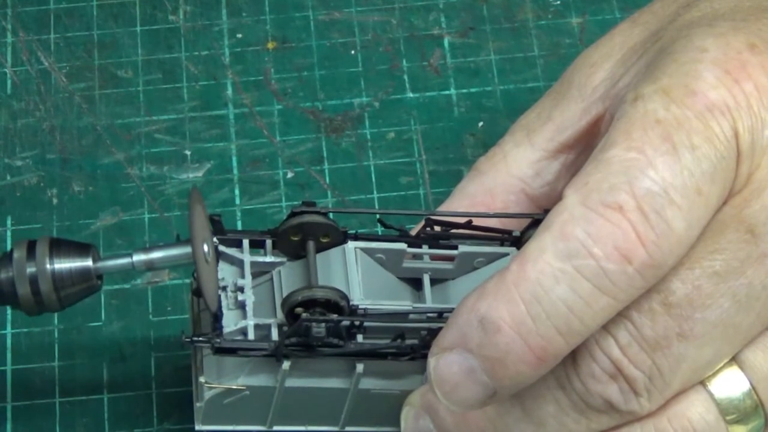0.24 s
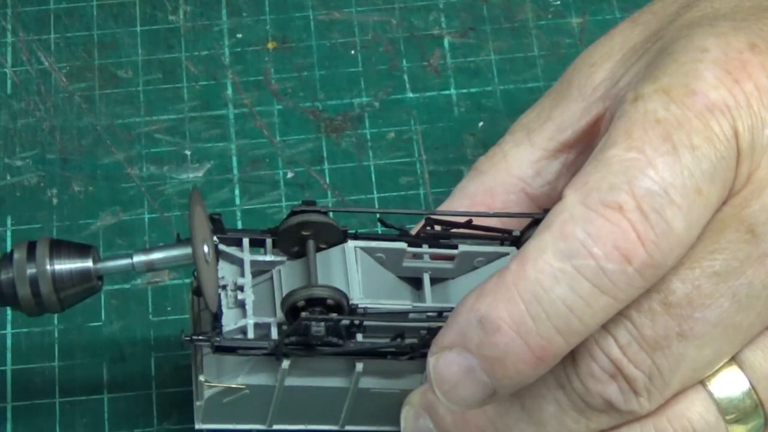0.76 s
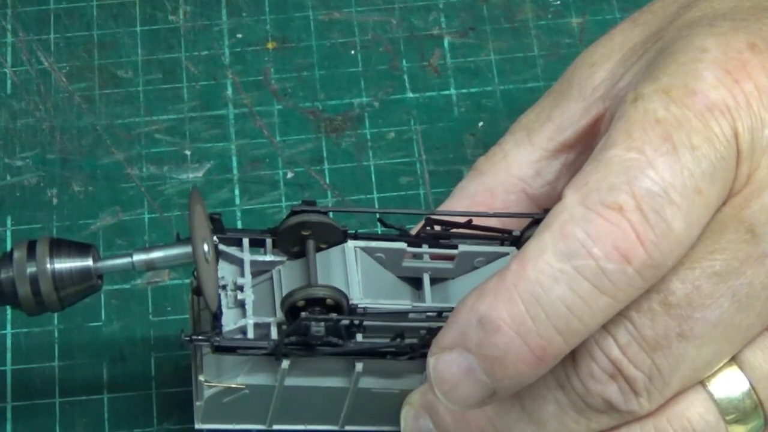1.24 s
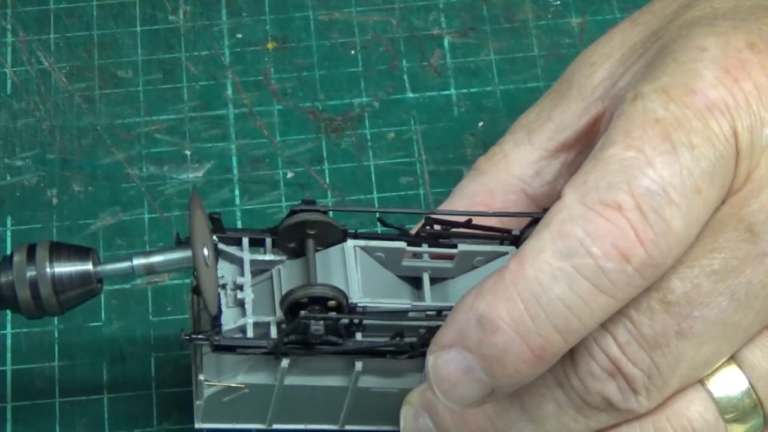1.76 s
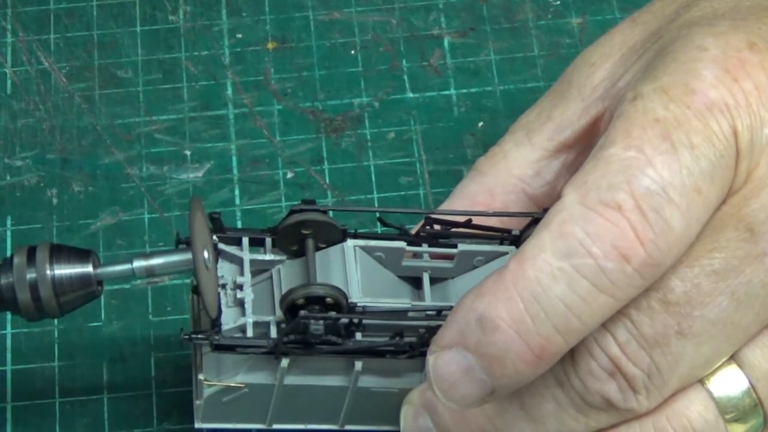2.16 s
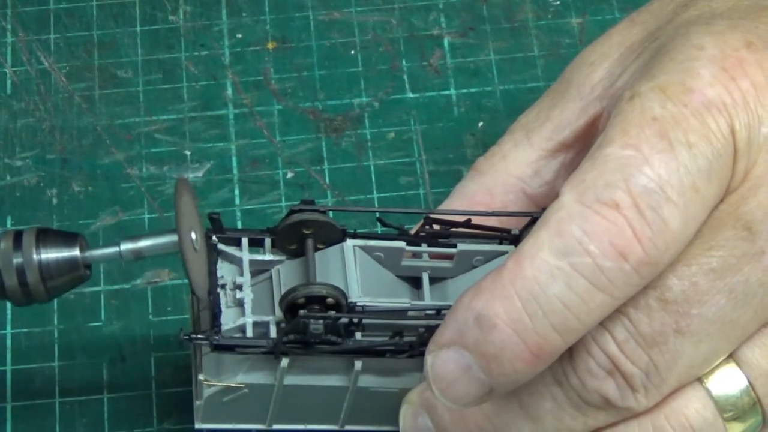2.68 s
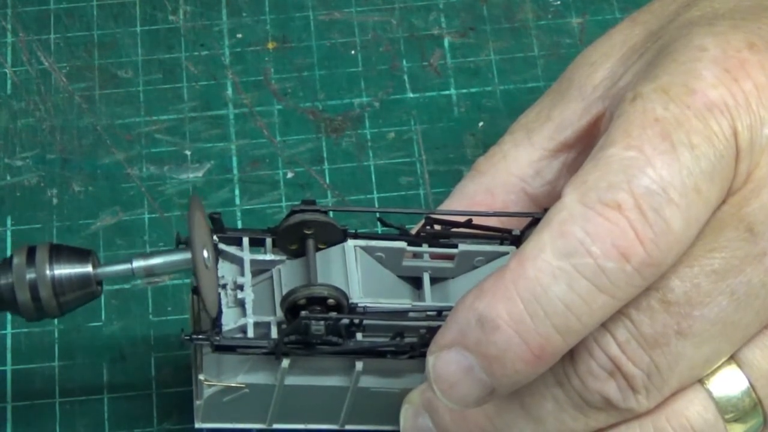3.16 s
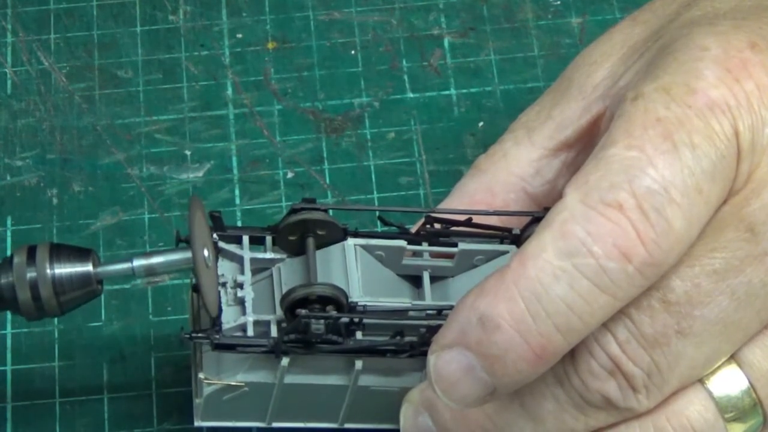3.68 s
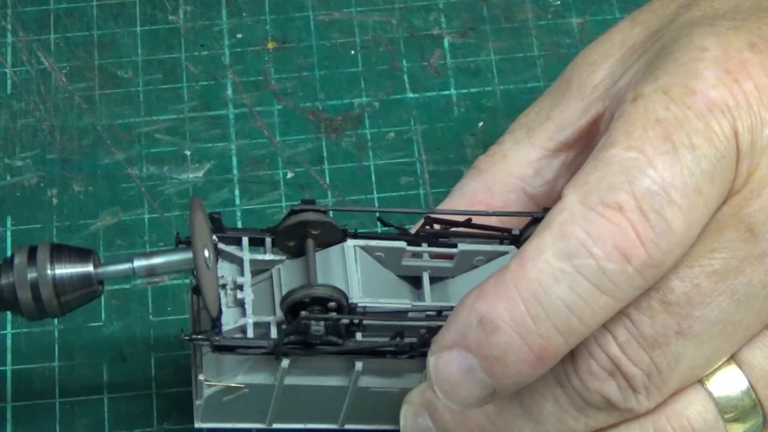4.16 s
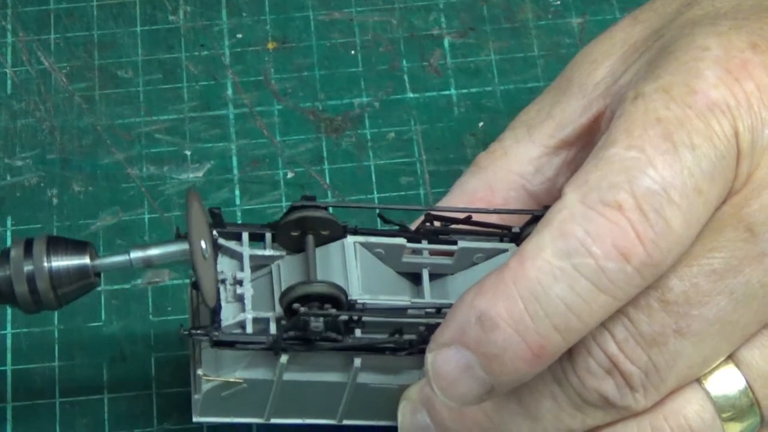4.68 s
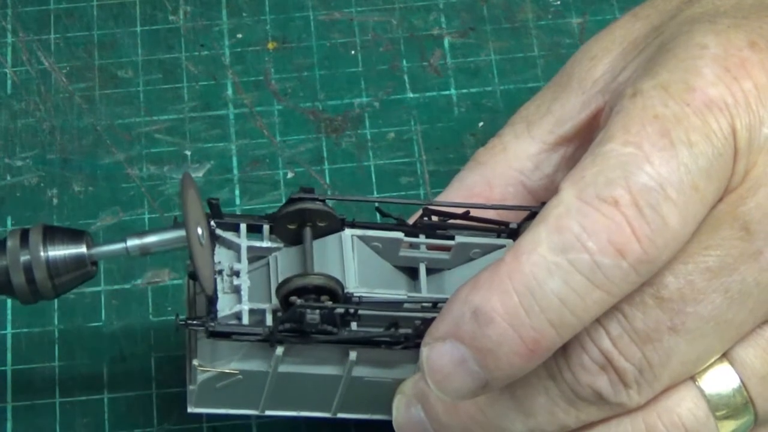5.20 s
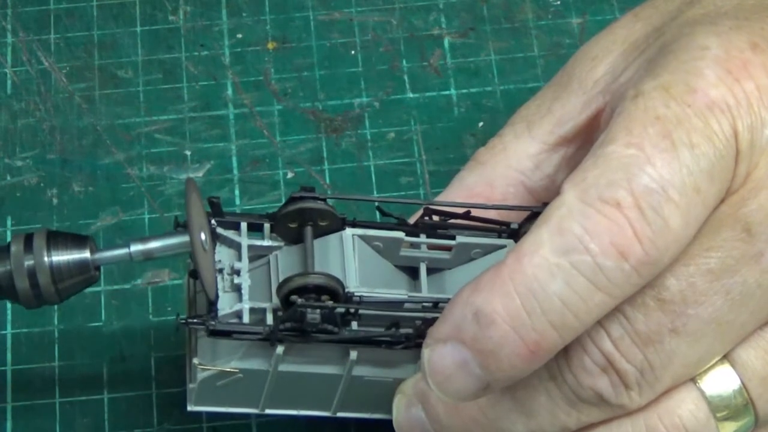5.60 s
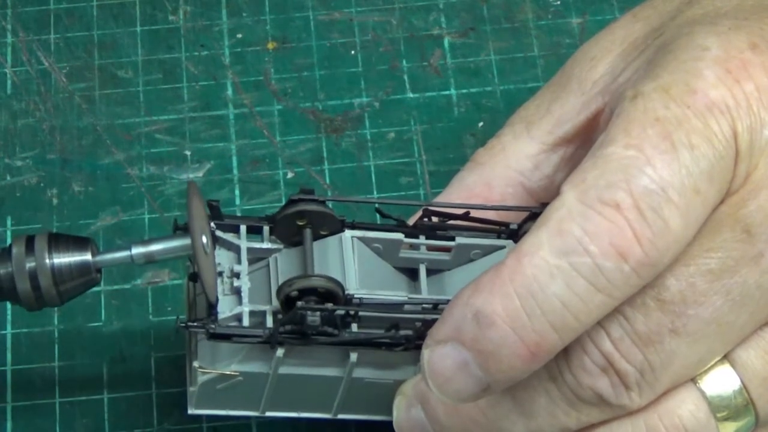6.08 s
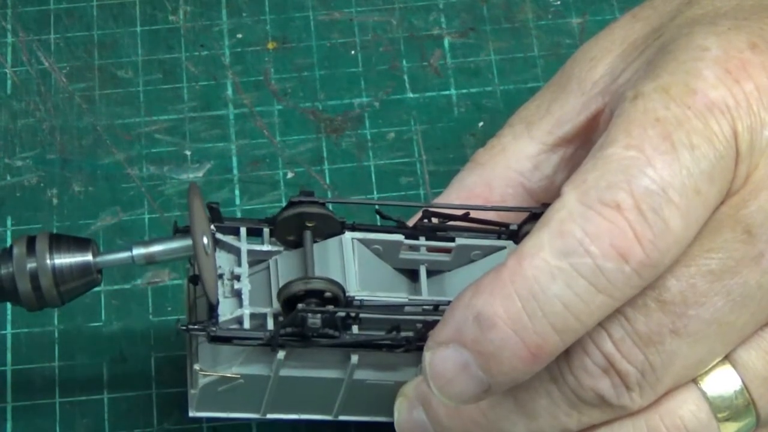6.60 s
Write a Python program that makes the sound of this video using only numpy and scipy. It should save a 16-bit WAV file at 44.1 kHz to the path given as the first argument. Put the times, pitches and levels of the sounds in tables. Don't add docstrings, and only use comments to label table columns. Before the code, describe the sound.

High-pitched hobby motor whirring close up, its pitch sagging as an abrasive disc bites plastic in two long rasping cuts, then shorter ones.

```python
import sys
import numpy as np
from scipy import signal
from scipy.fft import rfft, irfft
from scipy.io import wavfile
from scipy.ndimage import uniform_filter1d

SR = 44100
rng = np.random.default_rng(int(sys.argv[2]) if len(sys.argv) > 2 else 0)


def unload_wav(signal):
    wavfile.write(
        sys.argv[1],
        SR,
        np.round(np.clip(np.atleast_2d(signal).T, -1, 1) * 32767).astype(np.int16),
    )


def natural_amplitude(level_db):
    exponent = np.asarray(level_db, float) / 20
    return 10 ** exponent


N = 301644

# time in seconds, pitch of the third shaft order in Hz.
THIRD_ORDER_HZ = [(0.0, 628.6), (0.23, 643.0), (0.59, 643.5), (1.31, 603.3), (2.0, 613.3), (2.17, 594.8),
                  (2.46, 595.6), (2.95, 652.2), (3.26, 662.7), (3.5, 614.6), (3.64, 604.2), (4.4, 613.6),
                  (4.63, 589.4), (5.18, 650.5), (5.58, 667.4), (5.77, 632.3), (6.17, 661.3), (6.84, 659.3)]
MEAN_SHAFT_HZ = 210
LOW_ORDERS = {1: (-52.5, 0.1, -52.5, -0.13, 1.5), 2: (-62, .05, -53.5, 0.35, -2.5),
              3: (-42, -0.13, -45, -0.16, 2.5), 2.5: (-79, .05, -68, -0.04, -4),
              5: (-49.5, 0.47, -51.5, 0.48, 0), 6: (-44, 0.2, -48.5, 0.15, 4.5),
              8: (-50, -0.34, -55, 0.4, 0), 9: (-64.5, 0.6, -51.5, -0.03, 10)}
# multiple of shaft speed, level in dB.
UPPER_ORDERS = [(4, -53.5), (7, -86), (10, -48.5), (11, -47.5), (14, -50), (15, -73), (16, -68),
                (17, -47.5)]
HALF_ORDER_PER_BOUNCE = 1.7
# centre in Hz, width in Hz, lift in dB.
ORDER_LIFTS = [(1082, 40, 5.5), (1236, 97, 2), (1708, 130, 13.5), (2024, 50, 1)]
# time in seconds, cycles counted.
BEARING_WOBBLE = [(0, .38), (3.2, 40.1), (5.0, 61.96), (6.0, 74.38), (6.84, 85.27)]
# order, swell in dB, double swell in dB, lag in cycles.
WOBBLE_BEADS = [(2.5, 1, 1, 0), (5, 8, 5.5, 0), (6, 7, -3, .38), (8, 4, 6, .03), (9, 2, 2, .1)]
# frequency in Hz, density in dB per Hz.
AIR_SPECTRUM = [(24, -53), (40, -14), (96, -17.5), (150, -12.5), (208, -13.5), (260, -14.5), (550, -19),
                (639, -9.5), (761, -11.5), (1080, -7.5), (2520, -3.5), (4260, -1.5), (10700, -8),
                (15600, -16.5)]
# centre in Hz, width in Hz, level in dB.
HOUSING_MODES = [(1143, 63, -6), (1680, 27, 14.5), (2010, 80, -5), (2235, 22, 8), (3033, 91, 3),
                 (3390, 63, 13.5), (3727, 39, 5), (4237, 356, 9.5), (4606, 240, 0.5), (8300, 170, -5),
                 (9600, 270, -14), (8180, 97, 7.5), (7460, 190, -1)]
RATTLE_DB, RATTLE_DB_PER_HZ = -24.5, 0.0659
# time in seconds, level in dB.
NEARNESS = [(0, -0.8), (1.2, 0.4), (2.5, 1.), (3.2, 0), (4.0, 1), (4.8, -2), (5.5, -1.), (6.84, -.5)]
MAINS_DB = -55
MAINS_OVERTONE_DB, MAINS_OVERTONE_PHASE = -55.5, 0.35
# time in seconds, level in dB.
BENCH_DRONE = [(0.0, -52), (0.052, -47), (0.202, -43), (0.302, -48), (0.43, -61), (0.5, -64)]
# touch in seconds, leave in seconds, time to dig in in seconds.
BITES = [
    (.165, 2.48, .12),
    (3.175, 4.67, .07),
    (5.52, 5.83, .14),
    (6.09, 7.0, .03),
]
LAND_S, LEAVE_S, SETTLE_S = .025, .045, .3
# middle in seconds, length in seconds, rim level in dB, edge level in dB.
SKIMS = [
    (0.187, 0.046, -30, -32),
    (.24, .06, -29, -24),
    (.5, .03, -24, -36),
    (2.515, 0.037, -27, -34),
    (3.191, .03, -34, -25),
    (5.467, 0.036, -26, -31),
    (5.544, 0.047, -21, -36),
    (5.86, .06, -33, -36),
    (6.7, .06, -24, -27),
    (6.82, 0.074, -36, -27),
]
# centre in Hz, width in Hz, level in dB.
RIM_TICK_MODES = [(11540, 260, -3), (8500, 330, -4), (10400, 400, -6)]
# centre in Hz, width in Hz, level in dB.
EDGE_TICK_MODES = [(14100, 800, 0.), (13000, 500, -9)]
TICK_DB, SKIM_GRIT_DB = -1.5, -4.5
FRESH_SQUEAL_DB = -32
# centre in Hz, width in Hz, level in dB.
DISC_MODES = [(9930, 970, 4.5), (8400, 660, -16), (10210, 240, -15), (11440, 480, -1), (10560, 200, -7)]
# centre in Hz, width in Hz, level in dB.
RIM_MODES = [(12000, 740, 3), (12600, 290, -4)]
# centre in Hz, width in Hz, level in dB.
EDGE_MODES = [(14000, 2700, -7), (12500, 500, -7), (13700, 400, -5)]
# centre in Hz, width in Hz, level in dB.
PLASTIC_MODES = [(1114, 204, -9), (1944, 112, -1), (2298, 43, 1), (2995, 340, -3), (3380, 356, 0),
                 (4435, 240, -3), (5027, 117, 0.5), (5384, 300, -0.5), (5970, 134, 0.5), (6330, 92, 1),
                 (6970, 340, -1), (7820, 560, -4), (8370, 120, 1.5)]
# idle level in dB, cutting level in dB, share of the pressure, hand tremor in dB.
BODIES = [
    (-38.5, -21.5, 1.98, 0.5),
    (-57, -32.5, 1.6, 1),
    (-56, -31, 1, 0.8),
    (-37.5, -24, 0.75, 1.43),
]
IDLE_DB_PER_HZ = 0.31
EASE_SHARES = (0.71, 0.35, .7, 0.73)
# time in seconds, level in dB.
HAND_PRESSURE = [(.3, 0.3), (.7, 0.5), (1.1, 1), (1.4, .5), (1.65, -0.5), (2.0, .5), (2.25, 1), (2.45, 0),
                 (3.3, 1.), (3.6, 0.8), (3.9, 0), (4.15, 0.3), (4.4, 0.9), (4.65, 0.5), (5.7, 1.5),
                 (6.2, 0.7), (6.5, 1), (6.84, -.5)]
# middle in seconds, length in seconds, depth in dB.
EASES = [
    (1.746, .04, 1.5),
    (6.298, .05, 10),
    (6.39, 0.07, 9.5),
    (6.73, 0.069, 6),
]
LIGHT_THROB_DB, DEEP_THROB_DB = 6.5, 2.3
# start in seconds, end in seconds, depth in dB, bounces per turn,
# unevenness in cycles.
BOUNCES = [
    (.3, 1.15, 5.5, .5, .05),
    (1.15, 2.45, 4.2, .445, .3),
    (3.62, 4.35, 5.3, .5, .13),
    (4.35, 4.7, 4.5, .4, .15),
    (5.75, 5.9, 4, .5, .05),
    (6.115, 6.72, 6.8, .5, .02),
    (6.72, 7, 3, .5, .03),
]
BENCH_NOTCH_HZ, BENCH_NOTCH_WIDTH_HZ, BENCH_NOTCH_SHARE = 745, 120, .65
# frequency in Hz, side minus mid level in dB.
ROOM_WIDTH = [(60, -36), (110, -33), (200, -28), (380, -17), (700, -22), (1290, -16), (2380, -19.5),
              (4400, -19), (8120, -14), (15000, -35)]


def in_time(rows):
    s, *columns = np.transpose(rows)
    return [np.interp(np.arange(N) / SR, s, c) for c in columns]


def rms_one(x):
    return x / np.sqrt(np.mean(x ** 2) + 1e-20)


def drift(rate):
    r = np.exp(-40 * np.pi * rate / SR)
    slow = signal.lfilter([1], [1, -2 * r, r * r], rng.standard_normal(N // 20 + 3002))[3000:]
    return np.interp(np.arange(N) / 20, np.arange(len(slow)), rms_one(slow))


def colour(x, spectrum):
    hz = np.maximum(np.arange(N // 2 + 1) * SR / N, 1)
    points = np.array(spectrum)
    gain_db = np.interp(np.log(hz), np.log(points[:, 0]), points[:, 1])
    return irfft(rfft(x) * natural_amplitude(gain_db), N)


def resonate(x, modes):
    out = np.zeros(N)
    for k, (hz, width, level_db) in enumerate(modes):
        r = np.exp(-np.pi * width / SR)
        zeros = [(1 - r * r) / 2, 0, (r * r - 1) / 2]
        poles = [1, -2 * r * np.cos(2 * np.pi * hz / SR), r * r]
        out += (-1) ** k * natural_amplitude(level_db) * signal.lfilter(zeros, poles, x)
    return out


def high_pass(x, order, hz):
    return signal.sosfilt(signal.butter(order, hz, "high", fs=SR, output="sos"), x)


def grit(spread_db):
    return rms_one(rng.standard_normal(N) * natural_amplitude(spread_db * rng.standard_normal(N)))


def throb(cycles, depth_db, sharp):
    angle = 2 * np.pi * cycles
    gain = natural_amplitude(depth_db * np.tanh(1.5 * np.cos(angle + sharp * np.cos(angle))))
    return gain / np.sqrt(uniform_filter1d(gain ** 2, size=2000))


def locked(cycles, renew):
    rows = int(renew * N / SR) + 3
    patterns = rms_one(irfft(np.exp(2j * np.pi * rng.random((rows, 129))), axis=1))
    blend = np.arange(N) / SR * renew
    row = blend.astype(int)
    angle = (cycles % 1 * 256).astype(int)
    fade = (blend - row) * np.pi / 2
    return patterns[row, angle] * np.cos(fade) + patterns[row + 1, angle] * np.sin(fade)


def ramp(start, length):
    return np.clip((np.arange(N) / SR - start) / length, 0, 1)


def bump(middle, length):
    return np.exp(-(2 * (np.arange(N) / SR - middle) / length) ** 2)


def tone_db(order, shaft_hz, touch, settled):
    free_db, free_slope, cut_db, cut_slope, fresh_db = LOW_ORDERS[order]
    faster = shaft_hz - MEAN_SHAFT_HZ
    lift_db = sum(peak_db / (1 + (2 * (order * shaft_hz - hz) / width) ** 2)
                  for hz, width, peak_db in ORDER_LIFTS)
    free = (1 - touch) * (free_db + free_slope * faster)
    cutting = touch * (cut_db + cut_slope * faster)
    return free + cutting + fresh_db * (touch - settled) + lift_db


def whine(shaft_hz, turns, wobble, touch, settled, bounce_db):
    out = np.zeros(N)
    for order, flutter_db in zip((1, 2, 3), (1.3, 1.8, 2.2)):
        level_db = tone_db(order, shaft_hz, touch, settled)
        level_db = level_db + flutter_db * (drift(35) + drift(1.66)) * 0.88
        out += natural_amplitude(level_db) * np.sin(2 * np.pi * order * turns + .07 * order * drift(15))
    for order, once_db, twice_db, lag in WOBBLE_BEADS:
        level_db = tone_db(order, shaft_hz, touch, settled)
        if order % 1 > 0:
            level_db = level_db + HALF_ORDER_PER_BOUNCE * bounce_db
        angle = 2 * np.pi * (wobble - lag)
        beads = natural_amplitude((.9 - .35 * touch) * (once_db * np.cos(angle) + twice_db * np.cos(2 * angle)))
        beads = beads / np.sqrt(uniform_filter1d(beads ** 2, size=7000))
        phase = 2 * np.pi * order * turns + (.2 + .35 * touch) * drift(25)
        out += beads * natural_amplitude(level_db + 1.2 * drift(30)) * np.sin(phase)
    for order, level_db in UPPER_ORDERS:
        swell_db = 5.2 * np.cos(4 * np.pi * (wobble + rng.random())) + 4.0 * drift(3.4) - 2.5
        phase = 2 * np.pi * order * turns + (.4 + .4 * touch) * drift(25)
        out += natural_amplitude(level_db + swell_db) * np.sin(phase)
    return np.sqrt(2) * out


def housing(shaft_hz, turns, wobble):
    low = grit(2.0) * throb(turns, 1.5, .3) + natural_amplitude(-3.) * locked(turns, renew=12.)
    low = low * natural_amplitude(.9 * np.cos(4 * np.pi * wobble) + .7 * drift(12))
    high = grit(2.5) * throb(2 * turns, 2.1, .3)
    source = low - high_pass(low, 2, 7000) + high_pass(high, 2, 7000)
    noise = colour(source + resonate(source, HOUSING_MODES), AIR_SPECTRUM)
    return natural_amplitude(RATTLE_DB + RATTLE_DB_PER_HZ * (shaft_hz - MEAN_SHAFT_HZ)) * rms_one(noise)


def hum():
    t = np.arange(N) / SR
    mains = natural_amplitude(MAINS_DB + 1.2 * drift(8)) * np.sin(200 * np.pi * t)
    overtone = np.sin(2 * np.pi * (200 * t + MAINS_OVERTONE_PHASE))
    mains = mains + natural_amplitude(MAINS_OVERTONE_DB + .8 * drift(4)) * overtone
    drone = np.sin(2 * np.pi * 177.6 * t) + natural_amplitude(-5.0) * np.sin(2 * np.pi * 236.9 * t)
    drone_gain = natural_amplitude(in_time(BENCH_DRONE)[0]) * (t < BENCH_DRONE[-1][0])
    return np.sqrt(2) * (mains + drone_gain * drone)


def contact():
    touch, depth, settled = np.zeros((3, N))
    for start, end, dig_s in BITES:
        held = 1 - ramp(end - LEAVE_S / 2, LEAVE_S)
        touch += ramp(start, LAND_S) * held
        depth += (ramp(start, LAND_S) + ramp(start, dig_s)) / 2 * held
        settled += ramp(start, SETTLE_S) ** 2 * held
    return touch, depth, settled


def skim_gains():
    rim = sum(natural_amplitude(rim_db) * bump(s, length) for s, length, rim_db, _ in SKIMS)
    edge = sum(natural_amplitude(edge_db) * bump(s, length) for s, length, _, edge_db in SKIMS)
    return [rim, edge]


def skim_ticks(turns, fresh):
    ticks = np.diff(np.floor(turns), prepend=0) * natural_amplitude(1.5 * drift(60)) + 1e-18
    edges = np.zeros(N)
    for gain, body in zip(skim_gains(), (RIM_TICK_MODES, EDGE_TICK_MODES)):
        edges += gain * rms_one(resonate(resonate(ticks, body), body))
    band = signal.butter(2, [1500, 6500], "band", fs=SR, output="sos")
    squeal = signal.sosfilt(band, resonate(ticks, PLASTIC_MODES))
    return natural_amplitude(TICK_DB) * edges + natural_amplitude(FRESH_SQUEAL_DB) * fresh * rms_one(squeal)


def body_gains(shaft_hz, touch, depth):
    press_db = in_time(HAND_PRESSURE)[0]
    ease_db = sum(drop_db * bump(s, length) for s, length, drop_db in EASES)
    rim_skim, edge_skim = natural_amplitude(SKIM_GRIT_DB) * np.array(skim_gains())
    reaches = (depth, touch, touch, depth)
    skims = (0, rim_skim, edge_skim, 0)
    gains = []
    for body, ease, reach, skim in zip(BODIES, EASE_SHARES, reaches, skims):
        idle_db, cut_db, share, tremor_db = body
        idle_db = idle_db + IDLE_DB_PER_HZ * (shaft_hz - MEAN_SHAFT_HZ)
        cut_db = cut_db + share * press_db - ease * ease_db + tremor_db * drift(10.5)
        gains.append(np.hypot(natural_amplitude(idle_db + reach * (cut_db - idle_db)), skim))
    return gains


def bouncing():
    rows = np.tile([[0], [.5], [.08]], N)
    for start, end, *values in BOUNCES:
        rows[:, int(start * SR):int(end * SR)] = np.array(values)[:, None]
    return uniform_filter1d(rows, size=4000, axis=1)


def cut(shaft_hz, turns, gains, settled, bounce):
    bounce_db, per_turn, uneven = bounce
    turn_db = LIGHT_THROB_DB + (DEEP_THROB_DB - LIGHT_THROB_DB) * settled
    bounces = np.cumsum(shaft_hz * per_turn) / SR + uneven * drift(5.6)
    shared = natural_amplitude(.6 * drift(20) + .9 * drift(90)) * throb(3 * turns, 2., .1)
    surface = natural_amplitude(-4.) * locked(turns, renew=15.)
    out = np.zeros(N)
    # modes, share of the bounce, share of the turn throb, low cut in Hz
    parts = [(DISC_MODES, .9, .5, 7500), (RIM_MODES, .8, .9, 10500),
             (EDGE_MODES, .8, 1.1, 12000), (PLASTIC_MODES, .65, .7, 700)]
    for gain, (body, bounce_share, turn_share, cut_hz) in zip(gains, parts):
        grains = (grit(3.4) + surface) * shared
        grains = grains * throb(bounces, bounce_share * bounce_db, 0.62)
        grains = grains * throb(turns, turn_share * turn_db, 1.0)
        out += gain * rms_one(high_pass(resonate(grains, body), 3, cut_hz))
    return out


def scene():
    shaft_hz = in_time(THIRD_ORDER_HZ)[0] / 3
    turns = np.cumsum(shaft_hz) / SR
    wobble, = in_time(BEARING_WOBBLE)
    touch, depth, settled = contact()
    bounce = bouncing()
    motor = natural_amplitude(in_time(NEARNESS)[0]) * housing(shaft_hz, turns, wobble)
    grinding = cut(shaft_hz, turns, body_gains(shaft_hz, touch, depth), settled, bounce)
    mid = whine(shaft_hz, turns, wobble, touch, settled, bounce[0]) + motor + grinding
    mid = mid + skim_ticks(turns, depth - settled) + hum()
    mid = mid - BENCH_NOTCH_SHARE * resonate(mid, [(BENCH_NOTCH_HZ, BENCH_NOTCH_WIDTH_HZ, 0)])
    echo = rng.standard_normal(8000) * natural_amplitude(-60 * np.arange(8000) / SR / .2)
    echo = echo / np.sqrt(np.sum(echo ** 2))
    side = colour(signal.fftconvolve(mid, echo)[:N], ROOM_WIDTH)
    side = side + natural_amplitude(-15.5) * high_pass(motor, 2, 1500)
    return np.array([mid + side, mid - side])


def band_limit(x):
    return signal.sosfilt(signal.butter(12, 15770, fs=SR, output="sos"), x)


def record(dry):
    top = signal.ellip(8, .3, 50, 15750, fs=SR, output="sos")
    mix = signal.sosfilt(top, .8 * np.tanh(dry / .8))
    return band_limit(mix)


dry = scene()
out = record(dry)
unload_wav(out)
```